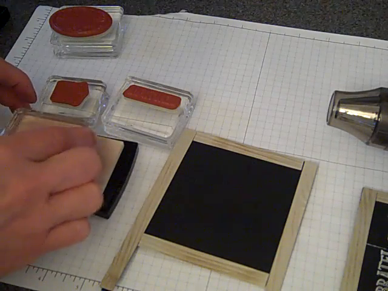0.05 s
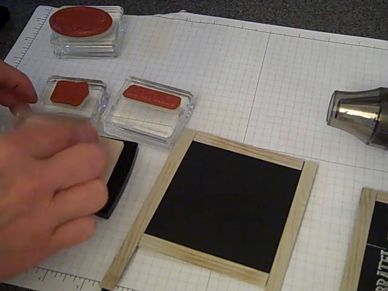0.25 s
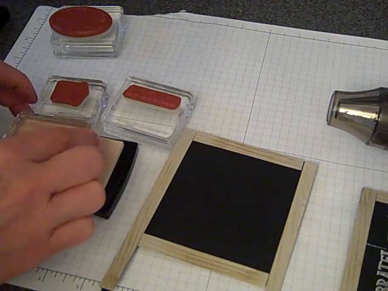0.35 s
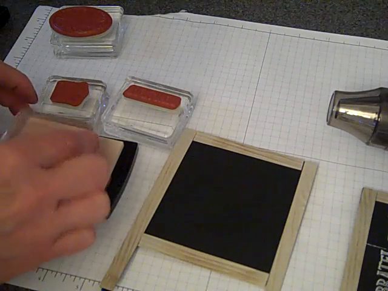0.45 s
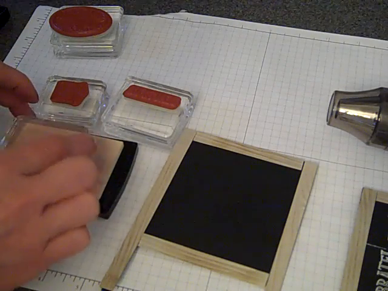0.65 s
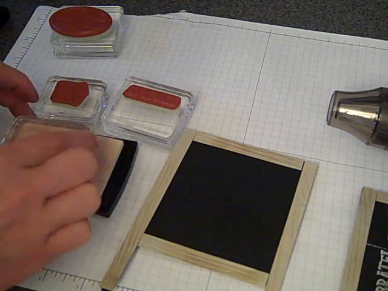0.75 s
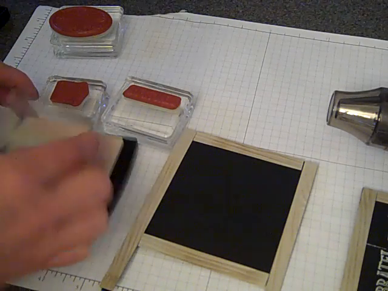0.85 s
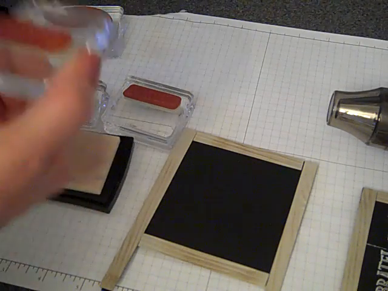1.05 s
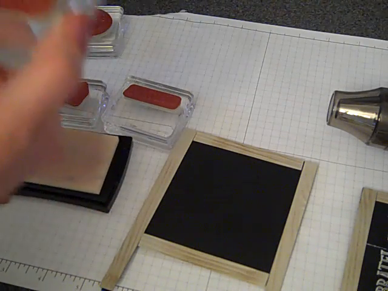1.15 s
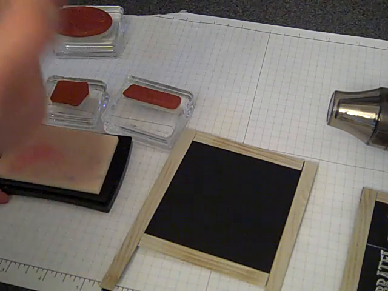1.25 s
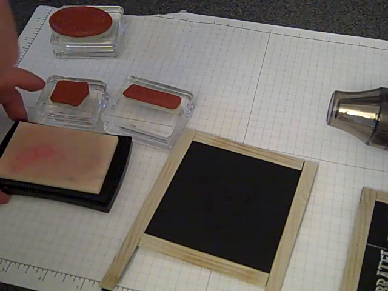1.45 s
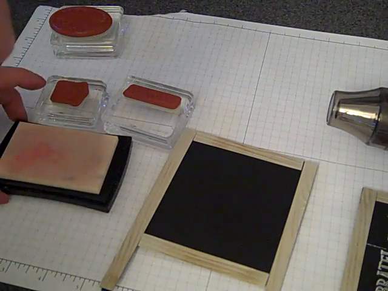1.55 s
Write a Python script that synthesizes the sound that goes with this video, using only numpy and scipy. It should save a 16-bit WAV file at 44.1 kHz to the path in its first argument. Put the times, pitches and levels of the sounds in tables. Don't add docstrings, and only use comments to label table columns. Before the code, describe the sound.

Close stereo microphone in a quiet indoor room: a plastic ink pad case knocks on the table twice, with sticky foam crackle and soft rebounds, then a weaker off-centre pat and a sharp rubber release.

```python
import sys
import numpy as np
from scipy import signal
from scipy.fft import rfft, irfft
from scipy.io import wavfile

SR = 44100
rng = np.random.default_rng(int(sys.argv[2]) if len(sys.argv) > 2 else 0)


def ratio(d):
    e = np.asarray(d, float) / 20
    return 10 ** e


def unload_wav(signal):
    wavfile.write(
        sys.argv[1],
        SR,
        np.round(np.clip(np.atleast_2d(signal).T, -1, 1) * 32767).astype(np.int16),
    )


N = 70560
RUN_IN = 13230
M = N + RUN_IN


def at_hz(points, hz):
    table_hz, values = np.array(points).T
    return np.interp(np.log(hz), np.log(table_hz), values)


def rms_one(x):
    return x / np.sqrt(np.mean(x ** 2) + 1e-20)


def butter(x, order, hz, kind="low"):
    return signal.sosfilt(signal.butter(order, hz, kind, fs=SR, output="sos"), x)


def ring(clicks, hz, t60_s):
    r, w = ratio(-60 / (t60_s * SR)), 2 * np.pi * hz / SR
    return signal.lfilter([0, np.sin(w)], [1, -2 * r * np.cos(w), r * r], clicks + 1e-18)


EDGES_HZ = 22 * 2 ** np.arange(0, 9.7, .5)
BANK = [signal.butter(2, [low, high], "band", fs=SR, output="sos")
        for low, high in zip(EDGES_HZ, EDGES_HZ[1:])]


def bands(source, likeness, gain):
    out = 0
    for k, hz in enumerate(np.sqrt(EDGES_HZ[1:] * EDGES_HZ[:-1])):
        mid, side = signal.sosfilt(BANK[k], source[k % 2])
        alike = np.clip(at_hz(likeness, hz), -1, 1)
        stereo = np.sqrt(1 + alike) * mid + np.sqrt(1 - alike) * side * [[1], [-1]]
        out = out + gain(hz) * stereo
    return out


# frequency in Hz, left-right likeness.
ONE_POINT = [(1, 1), (2, 1)]


def point_noise(source, colour):
    return rms_one(bands(source, ONE_POINT, lambda hz: ratio(at_hz(colour, hz)))[0])


# frequency in Hz, level in dB per Hz.
AIR_COLOUR = [(15, -63), (25, -46), (117, -3), (210, -21.5), (331, -6.5), (443, -17), (549, -16.5),
              (775, -17), (14500, -30)]
# frequency in Hz, left-right likeness.
AIR_LIKENESS = [(60, 0.2), (240, 0.6), (950, -0.24), (3770, -0.015), (15000, -0.14)]


def air():
    air_db, hum_hz, hum_db = -57.5, 117, -70
    noise = bands(rng.standard_normal((2, 2, M)), AIR_LIKENESS, lambda hz: ratio(at_hz(AIR_COLOUR, hz)))
    hum = np.sin(2 * np.pi * hum_hz * np.arange(M) / SR)
    return ratio(air_db) * rms_one(noise) + ratio(hum_db) * hum


def contact(rings, cut_hz, db, reach):
    strike = ratio(db + rng.standard_normal(len(rings)))
    return butter((reach * strike) @ rings, 3, min(cut_hz, 18000))


# frequency in Hz, level in dB per Hz.
CHATTER_COLOUR = [(1500, -25.5), (3000, 7), (5000, 4.5), (7000, 4.5), (9000, -17.5), (14000, -21)]


def chatter(t):
    t60_s = .022
    grains = rng.standard_normal((2, 2, len(t))) * rng.random(len(t))
    return point_noise(grains, CHATTER_COLOUR) * ratio(-60 * t / t60_s)


def edge_tick(t):
    hz, ring_t60_s, scrape_t60_s = 8400, .0007, .0038
    scrape = rng.standard_normal(len(t)) * ratio(-60 * t / scrape_t60_s)
    return np.diff(ring(scrape, hz, ring_t60_s), prepend=0)


def knocks(rows, modes, high_reach_db):
    tick_lead_s = .0012
    smack_db, scatter_db = 12, 26
    scattered_above_hz = 3000
    out, t = np.zeros((2, M)), np.arange(SR // 5) / SR
    short = t[:SR // 20]
    click = 1 * (t == 0)
    smack = butter(click[:len(short)], 2, [2730, 9200], "band")
    rings = np.array([ratio(db) * butter(ring(click, hz, t60_s), 2, 1.02 * hz, "high")
                      for hz, db, t60_s in modes])
    to_room = np.where(np.array(modes)[:, 0] < scattered_above_hz, 1, ratio(high_reach_db))
    reach = np.array([np.ones(len(modes)), to_room])
    for s, db, tick_db, cut_hz, chatter_db in rows:
        at = RUN_IN + int(s * SR)
        out[:, at:at + len(t)] += contact(rings, cut_hz, db, reach)
        near = chatter(short) + ratio(smack_db) * smack
        out[:, at:at + len(short)] += ratio(chatter_db) * np.array([near, ratio(scatter_db) * smack])
        early = at - int(tick_lead_s * SR)
        out[0, early:early + len(short)] += ratio(tick_db) * edge_tick(short)
    return out


# start in s, peak in dB, edge tick in dB, contact cut in Hz, chatter in dB.
TAPS = [
    (-.14, -8.5, -16, 5820, -25.5),
    (.2112, -2, -26, 7200, -16.5),
    (.5658, -3, -26.5, 6200, -18.5),
]
# frequency in Hz, level in dB, t60 in s.
CASE = [(100.5, -28.5, 0.057), (224.5, -33, 0.08), (322, -23.5, 0.024), (356, -18.5, 0.037),
        (453, -16, 0.014), (852, -36, 0.096), (1047, -17.5, 0.089), (1180, -2.5, 0.017), (1328, -3, 0.012),
        (1593, -21, 0.027), (2230, -7.5, 0.03), (2507, -1.5, 0.004), (4493, -3.5, 0.0038),
        (6630, -2, 0.0031)]


def case_taps():
    return knocks(TAPS, CASE, high_reach_db=-22)


# start in s, peak in dB, edge tick in dB, contact cut in Hz, chatter in dB.
ROCKS = [
    (-.028, -22.5, -76, 1790, -63),
    (.3257, -22.5, -80, 1840, -67),
    (.6755, -19, -80, 1930, -49),
    (.998, -31, -80, 1500, -57),
]
# frequency in Hz, level in dB, t60 in s.
CASE_ROCK = [(58.4, -21, 0.19), (89, -12, 0.047), (322, -8.5, 0.029), (416, -17, 0.082),
             (890, -27.5, 0.041), (1082, -2, .02), (1310, 6.5, 0.0077), (1600, -16, 0.004),
             (2188, -1, 0.024)]


def case_rocks():
    return knocks(ROCKS, CASE_ROCK, high_reach_db=0)


# peak in s, rms in dB, rise in s, fall in s, treble in dB.
SQUEEZES = [(.158, -62, 0.0029, 0.0052, 9.5), (0.17, -47, 0.0028, 0.019, -7.5),
            (0.538, -48, 0.013, 0.0074, -1), (.79, -63.5, .01, 0.04, 5), (0.876, -52.5, 0.0066, 0.0092, 2),
            (0.898, -39.5, 0.0049, .005, -5.5), (0.954, -42.5, 0.0028, .003, -9),
            (1.079, -55.5, 0.016, .006, 12.5)]
# frequency in Hz, level in dB per Hz.
FOAM_COLOUR = [(180, -33), (300, -1), (593, -8), (1400, 2), (2040, -8), (2730, -11), (7700, -5.5),
               (14500, -61)]


def foam():
    grains_per_s, spread_db, split_hz = 9000, 2.0, 4200
    t = (np.arange(M) - RUN_IN) / SR
    popping = rng.random((2, 2, M)) < grains_per_s / SR
    size = ratio(spread_db * np.minimum(rng.exponential(1, M), 3.0))
    full = point_noise(popping * size * rng.choice([-1, 1], M), FOAM_COLOUR)
    low, high = butter(full, 2, split_hz), butter(full, 2, split_hz, "high")
    out = np.zeros(M)
    for s, db, rise_s, fall_s, treble_db in SQUEEZES:
        swell = np.exp(-((t - s) / np.where(t < s, rise_s, fall_s)) ** 2 / 2)
        out += ratio(db) * swell * (low - ratio(treble_db) * high)
    return out


# start in s, peak in dB, edge tick in dB, contact cut in Hz, chatter in dB.
SLANT_TAPS = [
    (.9343, -13, -24.5, 4000, -25.5),
    (.9368, -30.5, -66, 3020, -45),
]
# frequency in Hz, level in dB, t60 in s.
CASE_SLANT = [(93.6, -17.5, 0.06), (320, -10, 0.03), (416.7, -23.5, 0.096), (686, -17.5, 0.017),
              (798, -7, 0.028), (1023, -11, 0.067), (1179, 6, 0.012), (1530, -6, 0.022),
              (2083, -12.5, 0.029), (2440, -19.5, 0.034), (3320, -28, 0.014), (4370, -13, 0.0048)]


def slanted_pat():
    return knocks(SLANT_TAPS, CASE_SLANT, high_reach_db=-8)


# start in s, peak in dB, edge tick in dB, contact cut in Hz, chatter in dB.
SNAPS = [
    (1.0865, -8.5, -39, 9000, -18.5),
    (1.0905, -22.5, -60, 9000, -37),
]
# frequency in Hz, level in dB, t60 in s.
BLOCK = [(860, -24.5, 0.047), (400, -26, 0.028), (1500, -6, 0.0094), (1983, -3.5, 0.0068),
         (2350, -5, 0.029), (2490, -7.5, 0.011), (2590, -5, 0.01), (3510, -13, 0.026), (4000, -14, 0.016),
         (4740, -2.5, 0.0019), (7420, -9.5, 0.017), (9000, -6.5, .005)]


def rubber_snap():
    return knocks(SNAPS, BLOCK, high_reach_db=-0.5)


# delay in s, level in dB, left-right in dB.
ECHOES = [
    (.0095, -32, 2),
    (.0155, -31, -2),
]
# frequency in Hz, t60 in s.
ROOM_T60 = [(60, .5), (300, 0.56), (1100, 0.81), (2500, 0.74), (6000, 0.74), (12000, 0.72)]
# frequency in Hz, level in dB.
ROOM_COLOUR = [(60, -8), (300, -6.5), (1100, -18), (2500, -20.5), (6000, -16), (12000, -35.5)]
# frequency in Hz, left-right likeness.
ROOM_LIKENESS = [(60, .9), (300, 0.94), (1000, 0.94), (2500, 0.257), (8000, 0.05)]


def room(x):
    onset_s, smear_s = .017, .002
    t = np.arange(SR) / SR
    build = 1 - np.exp(-(t / onset_s) ** 2)
    early = 0
    for lag_s, db, pan_db in ECHOES:
        level = ratio(db + 19.5 + pan_db * np.array([[.5], [-.5]]))
        early = early + level * (t > lag_s) * np.exp(-np.abs(t - lag_s) / smear_s)
    tail = bands(rng.standard_normal((2, 2, SR)), ROOM_LIKENESS,
                 lambda hz: ratio(at_hz(ROOM_COLOUR, hz) - 29 - 60 * t / at_hz(ROOM_T60, hz)))
    return signal.fftconvolve(x[None], tail * (build + 10 * early), axes=1)[:, :M]


def ports(x):
    from_hz, to_hz, damping, left_lag_s, left_db = 4570, 6510, 1, 6e-5, 0
    hz = np.fft.rfftfreq(M, 1 / SR)
    rise, level = (1 - (hz / corner) ** 2 + 1j * damping * hz / corner for corner in (from_hz, to_hz))
    half = ratio(left_db) * rise / level * np.exp(-1j * np.pi * hz * left_lag_s)
    return irfft(rfft(x) * np.array([half, 1 / half]), M)


def top_cut(x):
    return signal.sosfiltfilt(signal.butter(10, 14250, fs=SR, output="sos"), x)


def scene():
    near, feed = case_taps() + slanted_pat() + case_rocks() + rubber_snap() + foam()
    return (ports(near) + top_cut(room(feed) + air()))[:, RUN_IN:]


def band_limit(x):
    return signal.sosfilt(signal.butter(12, 16790, fs=SR, output="sos"), x)


def record(dry):
    bass_cut_hz, top_leak_db = 25, -30
    dry = butter(dry, 2, bass_cut_hz, "high")
    cut = top_cut(dry)
    return band_limit(cut + ratio(top_leak_db) * (dry - cut))


dry = scene()
out = record(dry)
unload_wav(out)
```